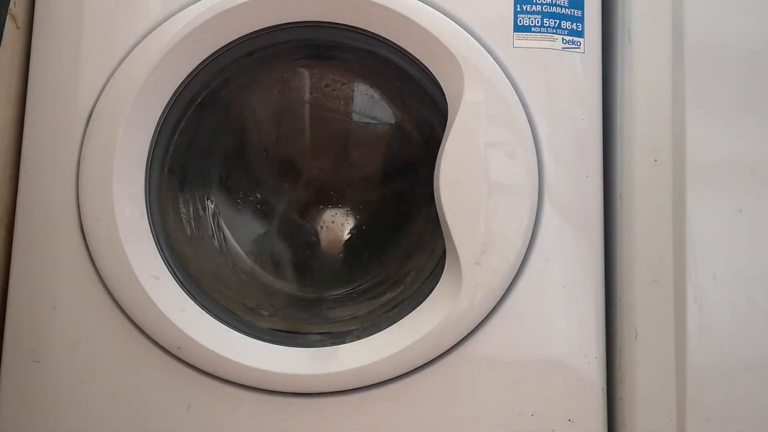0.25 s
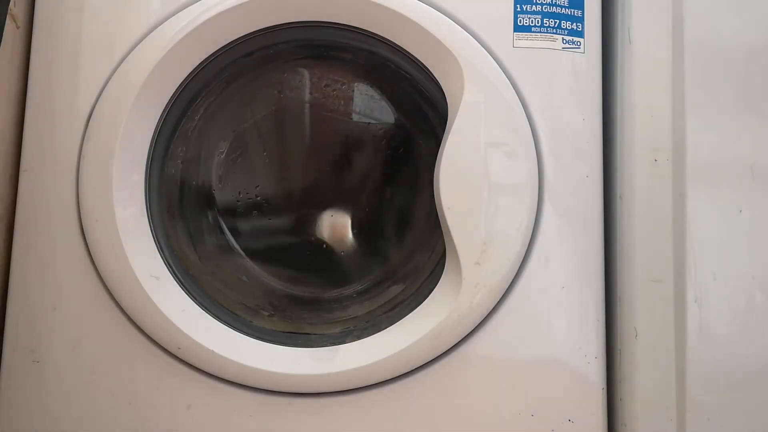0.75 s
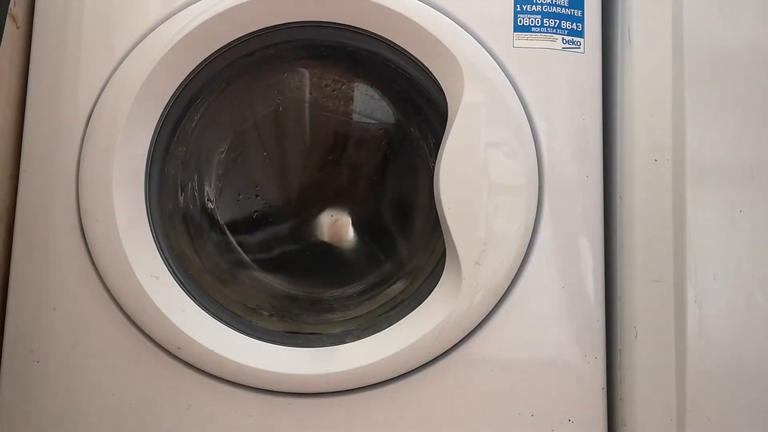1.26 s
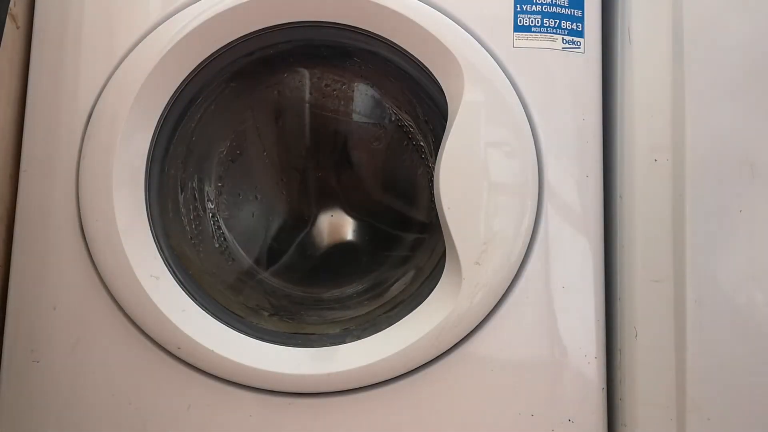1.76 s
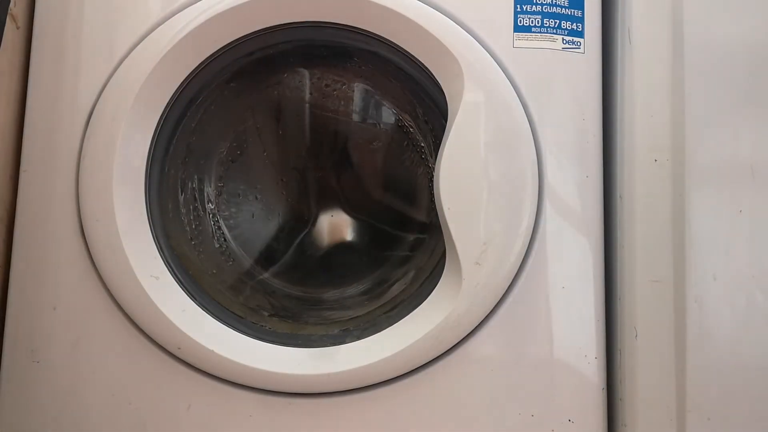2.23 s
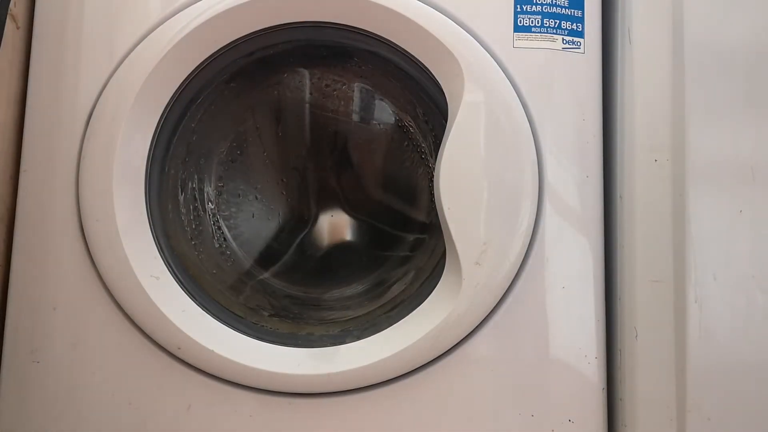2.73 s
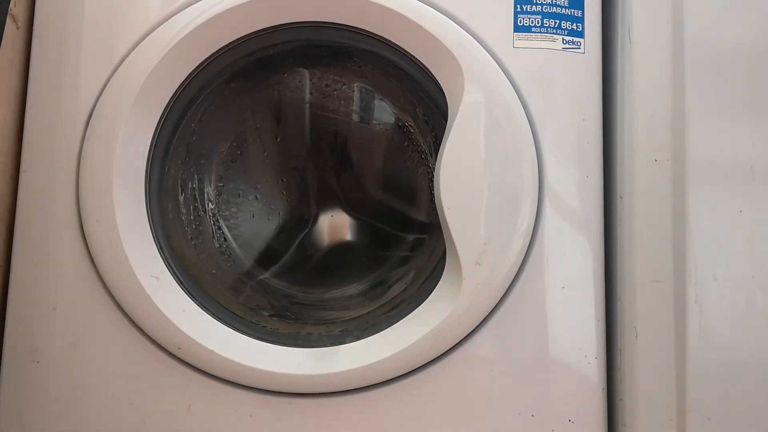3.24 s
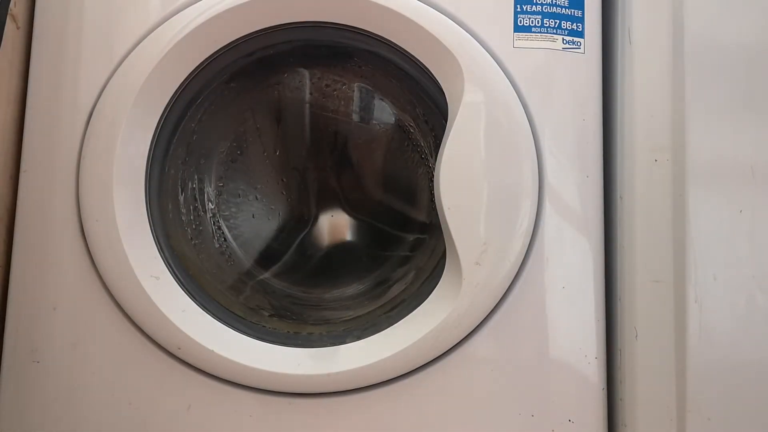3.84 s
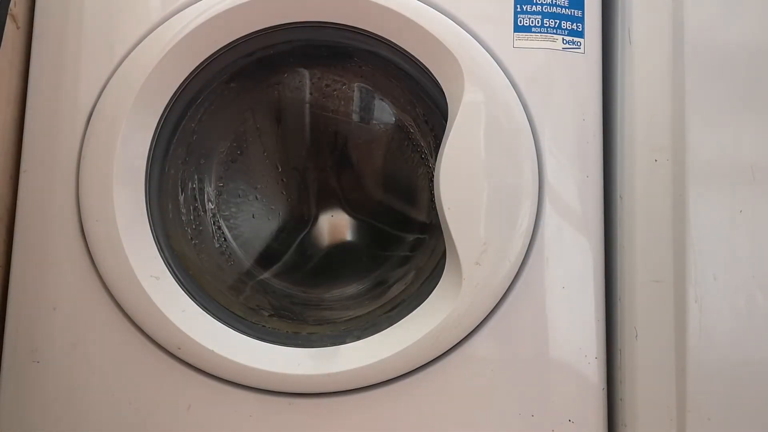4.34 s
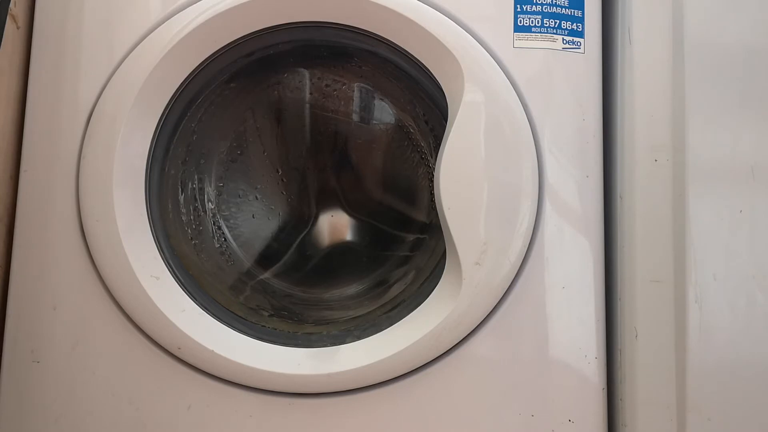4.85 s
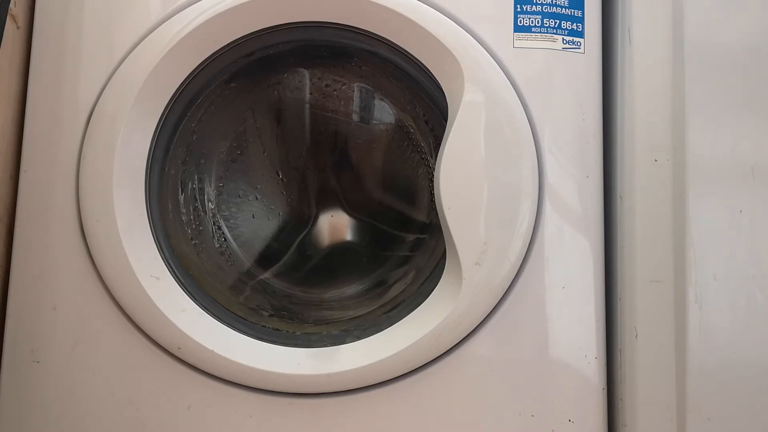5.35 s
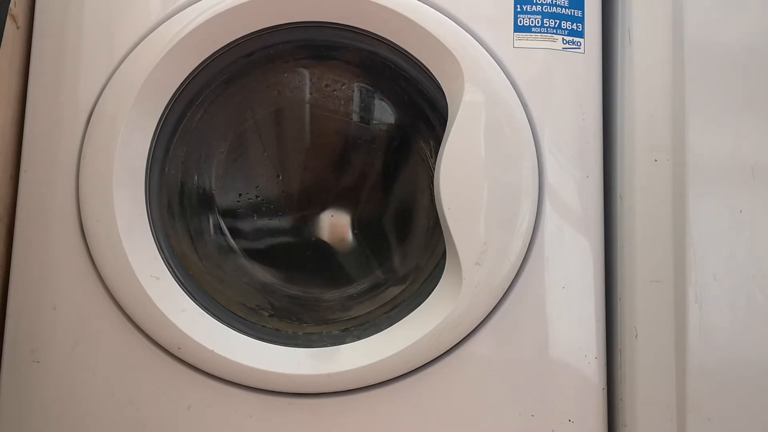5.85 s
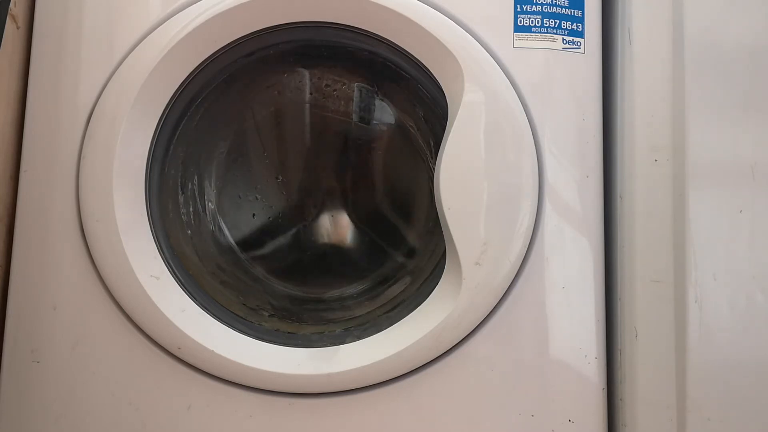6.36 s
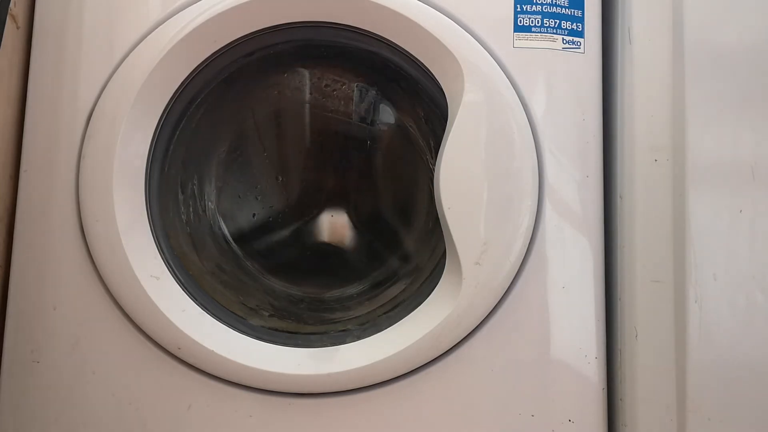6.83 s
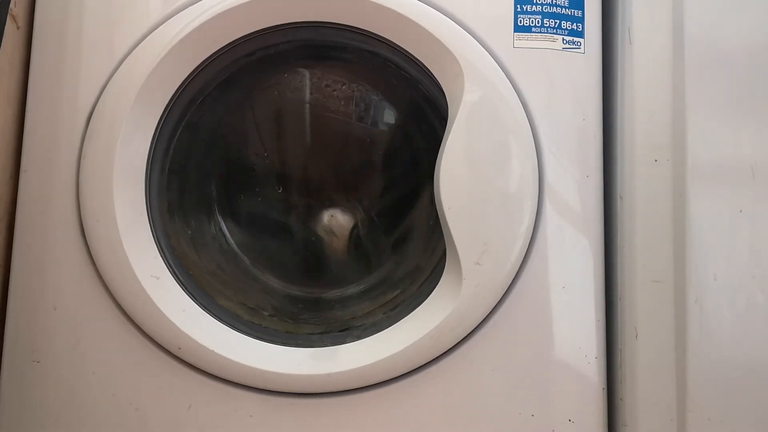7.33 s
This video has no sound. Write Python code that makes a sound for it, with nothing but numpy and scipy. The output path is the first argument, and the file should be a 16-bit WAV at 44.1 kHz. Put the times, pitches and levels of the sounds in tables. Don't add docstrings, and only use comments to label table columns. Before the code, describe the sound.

A front-loading washer turns with a deep fluttering rumble and ticking hiss, brakes to a low hum, then restarts with shrill squeals and speeds up.

```python
import sys
import numpy as np
from scipy import signal
from scipy.io import wavfile
from scipy.ndimage import uniform_filter1d

SR = 44100
rng = np.random.default_rng(int(sys.argv[2]) if len(sys.argv) > 2 else 0)


def store_pcm(level_fs):
    pcm = np.round(np.clip(level_fs, -1, 1) * 32767).astype(np.int16)
    wavfile.write(sys.argv[1], SR, np.atleast_2d(pcm).T)


def decibels_to_gain(level_db):
    exponent = np.asarray(level_db, float) / 20
    return 10 ** exponent


N = 334719
T = np.arange(N) / SR
START_S = 4.362
BACK = T > START_S
FORTH = T < START_S


def rms_one(x):
    return x / np.sqrt(np.mean(x ** 2) + 1e-20)


def in_time(rows):
    s, *columns = np.transpose(rows)
    return [np.interp(T, s, c) for c in columns]


def at_hz(points, hz):
    return np.interp(np.log(hz), np.log(np.array(points)[:, 0]), np.array(points)[:, 1])


def joined(*levels_db):
    return 10 * np.log10(sum(10 ** (db / 10) for db in levels_db))


def drift(rate):
    r = np.exp(-80 * np.pi * rate / SR)
    slow = signal.lfilter([1], [1, -2 * r, r * r], rng.standard_normal(N // 40 + 2002))[2000:]
    return np.interp(np.arange(N) / 40, np.arange(len(slow)), rms_one(slow))


def resonance(x, hz, width):
    r = np.exp(-np.pi * width / SR)
    return signal.lfilter([1, 0, -1], [1, -2 * r * np.cos(2 * np.pi * hz / SR), r * r], x)


def ringing(hz, width):
    return rms_one(resonance(rng.standard_normal((2, N)), hz, width))


# frequency in Hz, shared part from 0 to 1.
LIKENESS = [(60, 1), (130, 0.98), (250, 0.03), (500, 0.82), (1000, 0.02), (5000, 0.15), (15000, 0.2)]
# frequency in Hz, left minus right in dB.
LEAN = [(200, 0), (350, -1.5), (700, -.5), (1300, -1), (2400, 0), (8000, 0), (10000, -5), (12500, -10.5),
        (15000, -10)]
PORT_LAG = 25


def stereo(near, other, hz):
    alike, lean = np.clip(at_hz(LIKENESS, hz), 0, 1), at_hz(LEAN, hz) / 2
    late = np.roll(near, int(PORT_LAG * np.clip(np.log2(hz / 180), 0, 1)))
    right = alike * near + np.sqrt(1 - alike ** 2) * other
    return np.sqrt(2) * np.array([late * decibels_to_gain(lean), right * decibels_to_gain(-lean)])


def banded_noise(spectrum, level_db, patchy_db):
    low, high = spectrum[0][0], spectrum[-1][0]
    edges = np.geomspace(low, high, int(2 * np.log2(high / low)) + 2)
    centres = np.sqrt(edges[1:] * edges[:-1])
    total = np.sqrt(np.sum(decibels_to_gain(at_hz(spectrum, centres)) ** 2 * np.diff(edges)) / (SR / 2))
    out, together, white = 0, drift(1.9), rng.standard_normal((2, 2, N))
    for k, hz in enumerate(centres):
        sos = signal.butter(2, edges[k:k + 2], "band", fs=SR, output="sos")
        band = signal.sosfilt(sos, white[k % 2])
        gain_db = at_hz(spectrum, hz) + level_db(hz) + patchy_db * (together + drift(22.0))
        out = out + decibels_to_gain(gain_db) * stereo(*band, hz)
    return out / total


DOOR_SHIFT = 2.5
UPPER_BEND = .16


def orders(table, turns, lag, shift, bend, drag, wander_db):
    out = 0
    for k, level_db in table:
        phase = 2 * np.pi * k * (turns - lag) + shift + bend * (k - 6.7) ** 2 - drag * (k == 5)
        phase = phase + .18 * drift(.8) + .15 * rng.standard_normal()
        phase = phase + DOOR_SHIFT * (k == 11) + UPPER_BEND * max(k - 13, 0) ** 2
        out = out + decibels_to_gain(level_db + wander_db * drift(3.8)) * np.cos(phase)
    return rms_one(out)


# time in seconds, lead in turns.
LEAD = [(0, -.398), (1.2, -.405), (1.5, -.422), (2.4, -.53), (2.9, -.9), (4.36, -.82), (4.5, -1),
        (4.65, -1.15), (4.8, -1.18), (5.4, -1.176), (5.7, -1.11), (6, -1.06), (6.6, -1), (7.2, -.965),
        (7.5, -.958)]
SHAFT_HZ = 15.4


def shaft():
    return SHAFT_HZ * T + in_time(LEAD)[0]


# start in seconds, squeal level in dB, hold in seconds, jolt of the cabinet in dB.
GRIPS = [(2.353, -83, 0.12, -32), (2.54, -44.5, 0.018, -25.5), (2.59, -48, 0.021, -58),
         (2.636, -47.5, 0.055, -30.5), (2.783, -52.5, 0.059, -36), (2.856, -68, 0.11, -46),
         (2.98, -77, 0.058, -53), (3.251, -68.5, 0.07, -72), (3.346, -78, 0.054, -70),
         (3.487, -78, 0.046, -41), (3.86, -93, 0.16, -45.5), (4.1, -73.5, 0.071, -38),
         (4.358, -42.5, 0.094, -27), (4.457, -37, 0.15, -21.5), (4.547, -36.5, 0.075, -31.5),
         (4.616, -34, 0.12, -21.5), (4.706, -39.5, 0.15, -22.5), (4.746, -37, 0.034, -47),
         (4.81, -43.5, 0.079, -25), (4.873, -36.5, 0.051, -27), (4.935, -35.5, 0.049, -27),
         (5.005, -37.5, 0.087, -33), (5.14, -42, 0.033, -25.5), (5.202, -41.5, 0.1, -28.5),
         (5.317, -84, 0.064, -22), (5.4, -76, .04, -46), (5.458, -48.5, 0.078, -34),
         (5.527, -45, 0.082, -28), (5.606, -72, 0.05, -38), (5.706, -58, 0.063, -26.5),
         (5.774, -57, 0.092, -29)]
GRIP_ATTACK_S, GRIP_SAG_DB_PER_S, GRIP_RELEASE_DB_PER_S = 0.01, 47, 281.5


def grips():
    t = np.arange(0, N, 32) / SR
    squeals, jolts = [], []
    for s, squeal_db, hold, jolt_db in GRIPS:
        age = t - s
        bite_db = 20 * np.log10(np.clip(age / GRIP_ATTACK_S, 1e-5, 1))
        release_db = GRIP_RELEASE_DB_PER_S * np.clip(age - hold, 0, 1)
        shape_db = bite_db - GRIP_SAG_DB_PER_S * age - release_db
        shape_db = np.where(age > 0, np.maximum(shape_db, -100), -100)
        squeals.append(squeal_db + shape_db)
        jolts.append(jolt_db + shape_db)
    return in_time(np.transpose([t, joined(*squeals), joined(*jolts)]))


# time in seconds, level in dB.
EFFORT = [(0, -47), (2.35, -47.5), (2.52, -52.5), (2.68, -56), (2.76, -59.5), (3.0, -62.5), (3.1, -65),
          (3.8, -65.5), (4.1, -65), (4.35, -61.5), (4.38, -55), (4.46, -56.5), (4.52, -47.5), (4.97, -40.5),
          (5.19, -44.5), (5.4, -43), (6.0, -43), (7.5, -45)]
KNEE_DB = -53
TREBLE_DB, TREBLE_ABOVE, TREBLE_BELOW = -52.5, 0.48, 2.2
SHAKE_DB, SHAKE_ABOVE, SHAKE_BELOW = -29, 0.4, 7
GRIP_HISS_DB, GRIP_HISS_FOLLOWS = -56.5, 0.57
GRIP_TREBLE_DB, GRIP_TREBLE_FOLLOWS = -51.5, 0.77


def motor():
    effort_db, = in_time(EFFORT)
    above, below = np.maximum(effort_db - KNEE_DB, 0), np.minimum(effort_db - KNEE_DB, 0)
    grip_db, jolt_db = grips()
    hiss_db = joined(effort_db, GRIP_HISS_DB + GRIP_HISS_FOLLOWS * (grip_db + 53.5))
    treble_db = joined(TREBLE_DB + TREBLE_ABOVE * above + TREBLE_BELOW * below,
                       GRIP_TREBLE_DB + GRIP_TREBLE_FOLLOWS * (grip_db + 51))
    shake_db = joined(SHAKE_DB + SHAKE_ABOVE * above + SHAKE_BELOW * below,
                      uniform_filter1d(jolt_db, size=400))
    resting_db = np.clip(-61 - hiss_db, 0, 12)
    return hiss_db - resting_db, treble_db - hiss_db, shake_db


# multiple of the shaft rate, level in dB.
FORWARD = [(1, -29), (2, -2), (3, -9), (4, -1), (5, 0), (6, -2), (7, -3), (8, -7), (9, -14), (10, -9),
           (11, -6), (12, -15), (13, -18), (14, -27), (15, -28), (16, -33), (17, -31), (18, -30), (19, -27),
           (20, -24), (21, -40), (22, -38)]
REVERSE = [(1, -29), (2, -4), (3, -14), (4, -3), (5, -5), (6, 0), (7, -3), (8, -10), (9, -17), (10, -13),
           (11, -11), (12, -21), (13, -28), (14, -33), (15, -30), (16, -33), (17, -30), (18, -35),
           (19, -33), (20, -27), (21, -35), (22, -36)]
# frequency in Hz, density in dB per Hz.
RATTLE = [(15, -24), (28, -5.5), (48, 10), (97, 9.5), (178, -2), (237, -29.5), (303, -1), (400, -28),
          (520, -53), (880, -120)]
UPPER_DB, UPPER_FALL_DB = -42, 0.5
RATTLE_FORWARD_DB = -1


def cabinet(turns, shake_db):
    upper = [(k, UPPER_DB - UPPER_FALL_DB * (k - 23)) for k in range(23, 38)]
    forward = orders(FORWARD + upper, turns, .3, -.19, .02, 1.8, 1.2)
    reverse = orders(REVERSE + upper, turns, .34, .31, .02, .62, 1.2)
    shake = decibels_to_gain(shake_db + 0.5) * np.where(T < 3.6, forward, reverse)
    rattle_db = shake_db - 9.5 + RATTLE_FORWARD_DB * (T < 2.5)
    lagged = np.gradient(shake) * 4.1
    body = shake + lagged * [[1], [-1]] + banded_noise(RATTLE, lambda hz: rattle_db, patchy_db=1.0)
    driven = np.clip((shake_db + 42) / 8, 0, 1)
    dull = signal.sosfiltfilt(signal.butter(3, 140, fs=SR, output="sos"), body)
    return driven * body + (1 - driven) * dull


BRAKE_BASS_DB, BRAKE_TREBLE_DB, SURGE_BASS_DB, SURGE_S = -3.5, -5, 4, (4.5, 5.18)


def brush_level(turns, hiss_db, bright_db):
    angle = turns % 1
    ticks_db = 8 * np.exp(-angle / 0.03) + 4 * np.exp(-((angle - .27) % 1) / 0.027)
    beat_db = ticks_db + 3 * (angle < .45) - 2.5
    beat_db = beat_db * np.clip(0.64 + 0.19 * drift(14.0), .2, 1.35)
    braking = uniform_filter1d(((T > 2.55) & FORTH) * 1., size=3000)
    surge = uniform_filter1d(((T > SURGE_S[0]) & (T < SURGE_S[1])) * 1., size=3000)

    def level_db(hz):
        treble = np.clip(np.log2(hz / 2800), 0, 1)
        bass = np.clip(np.log2(1200 / hz), 0, 1)
        level = hiss_db + (BRAKE_BASS_DB * braking + SURGE_BASS_DB * surge) * min(1, 3 * bass)
        level = level + BRAKE_TREBLE_DB * braking * (hz > 7500)
        level = level - 0.8 * bass * np.clip(bright_db + 10.0, 0, 8) + treble * (bright_db + 3.0)
        return level + (0.41 + 0.79 * treble) * beat_db

    return level_db


# frequency in Hz, density in dB per Hz.
HISS = [(130, -49), (220, -12.5), (309, -6.5), (337, -1.5), (518, -8), (556, -9), (630, 1.5), (1400, -12),
        (1900, -2.5), (4390, -16), (5640, -14), (6510, -23.5), (12100, -19), (14800, -27.5), (15600, -47)]


def brushes(level_db):
    return decibels_to_gain(1.0) * banded_noise(HISS, level_db, patchy_db=1.26)


# frequency in Hz, width in Hz, level in dB.
HOUSING = [(1920, 32, -12), (2320, 470, -11.5), (5610, 410, -3), (7440, 390, -14), (10850, 40, -31)]
# frequency in Hz, width in Hz, level in dB, dB more in the second direction.
PANELS = [(264, 4, -23, 9), (309, 2, -14, 1), (410, 3, -20, 8), (436, 5, -20, -4), (573, 4, -14, 2),
          (690, 8, -19, 4), (826, 10, -19, 4), (1332, 40, -28, 6)]


def housing(level_db, hiss_db):
    out = 0
    squeal_db = grips()[0]
    for hz, width, ring_db, *back_db in HOUSING + PANELS:
        locked_db = np.clip(squeal_db - hiss_db + 16, 0, 4) * (5000 < hz < 6000)
        gain_db = ring_db + level_db(hz) - locked_db + sum(back_db) * BACK
        out = out + decibels_to_gain(gain_db) * stereo(*ringing(hz, width), hz)
    return out


# time in seconds, level in dB.
PUMP = [(0.0, -76), (0.66, -34.5), (1.3, -17), (2.0, -34.5), (2.67, -30), (3.0, -29.5), (3.08, -36),
        (3.56, -31.5), (3.77, -36.5), (4.04, -34.5), (4.16, -25.5), (4.3, -31), (4.42, -15.5), (4.6, -25),
        (5.3, -15), (6.0, -40), (6.6, -18.5), (7.48, -46)]
# multiple of the pump rate, level in dB.
THROB = [(1, 10), (2, 2.5), (3, 0), (4, -12.5), (5, -51.5), (6, -21.5), (7, -76), (8, -81), (9, -57.5),
         (10, -29)]
PUMP_HZ, PUMP_SWELL_DB, PUMP_SWELLS_PER_S = 30.75, 1.2, 5


def pump():
    throb = orders(THROB, PUMP_HZ * T, lag=.1, shift=.3, bend=.02, drag=0, wander_db=.6)
    pipe = stereo(*ringing(279, 5.0), 400)
    throb_db = in_time(PUMP)[0] - 6.5 + PUMP_SWELL_DB * drift(PUMP_SWELLS_PER_S)
    return decibels_to_gain(throb_db) * throb + decibels_to_gain(-70.0) * pipe * np.clip((4.15 - T) / 0.085, 0, 1)


# frequency in Hz, density in dB per Hz.
ROOM = [(76, -29), (130, 9.5), (194, -11), (219, -59), (278, -15), (340, -13.5), (407, -18), (518, -23),
        (907, -36), (1220, -20), (1530, -12.5), (3400, -25), (15600, -39.5)]
ROOM_DB = -64.5


def room():
    return banded_noise(ROOM, lambda hz: ROOM_DB + 3.5, patchy_db=.8)


# start in seconds, peak in dB, pitch in Hz, 60 dB decay in seconds,
# width as a share of the pitch.
KNOCKS = [(0.954, -32, 1840, 0.04, 0.16), (0.961, -20, 1125, 0.078, 0.072), (0.964, -36, 1900, 0.084, 0.24),
          (0.982, -26.5, 1150, 0.18, 0.16), (1.585, -29, 1900, 0.15, 0.96),
          (1.594, -27.5, 1730, 0.08, 0.15), (1.59, -32, 1110, 0.08, 0.16), (1.681, -17.5, 2620, 0.41, 0.1),
          (1.683, -28, 3120, 0.19, 0.073), (1.683, -27, 1100, 0.097, 0.79),
          (2.015, -27, 2330, 0.064, 0.072), (2.76, -48, 696, 0.15, 0.08), (2.82, -53, 706, 0.15, 0.08),
          (2.083, -20, 846, 0.22, 0.073), (6.688, -29, 840, 0.97, 0.44), (7.27, -30.5, 1120, 0.94, 0.29)]


def knocks():
    out, t = np.zeros((2, N)), np.arange(int(.3 * SR)) / SR
    for s, peak_db, hz, t60, share in KNOCKS:
        burst = rng.standard_normal((2, len(t)))
        burst[:, [2, 420]] = 15, 7
        ring = 0
        for side in (-.5, .5):
            split = resonance(burst, hz * (1 + side * share), share * hz / 2)
            ring = ring + resonance(split, hz, 2 * share * hz)
        ring = rms_one(ring) * decibels_to_gain(-60 * t / min(.11, t60))
        tail = resonance(resonance(burst[::-1], 1.12 * hz, 0.4 * hz), 1.05 * hz, .7 * hz)
        tail = rms_one(tail) * decibels_to_gain(-0.5 - 60 * t / t60)
        struck = np.sin(2 * np.pi * hz * t) * decibels_to_gain(-60 * t / min(0.05, t60))
        struck = struck * (share < .2)
        knock = (1.02 * ring + tail + 1.84 * struck) * np.minimum(t / 0.00025, 1)
        at = round(s * SR)
        out[:, at:at + len(t)] += decibels_to_gain(peak_db - 19.0) * knock
    return out


LOW_START_DB, LOW_FALL_DB_PER_S, LOW_REST_DB = 0, 50, -8.5
NEXT_PEAK_S, NEXT_SPAN_S, NEXT_PEAK_DB, NEXT_REST_DB = 4.64, 0.071, -4, -10.5


def load():
    falling_db = LOW_START_DB - LOW_FALL_DB_PER_S * np.clip(T - START_S - .12, 0, 9)
    low_db = np.where(T > START_S - .1, np.maximum(falling_db, LOW_REST_DB), LOW_REST_DB)
    near_speed = np.exp(-((T - NEXT_PEAK_S) / NEXT_SPAN_S) ** 2)
    next_db = NEXT_REST_DB + (NEXT_PEAK_DB - NEXT_REST_DB) * near_speed
    return grips()[0], low_db, next_db


# frequency in Hz, width in Hz, level in dB.
BRUSH = [(2230, 50, -9), (2760, 40, -17), (3610, 35, -15), (4030, 50, -19), (4250, 34, -13), (5580, 46, 0),
         (6240, 33, -8), (6650, 35, -16), (7120, 41, -9), (8040, 71, -19), (9190, 43, -15),
         (10600, 41, -16), (11900, 46, -19), (12400, 30, -23), (14400, 35, -17), (14900, 60, -27)]
# time in seconds, level in dB.
SING = [(2.45, -90), (2.54, -65), (2.7, -46.5), (2.76, -59), (2.8, -47), (2.95, -63), (3.02, -70),
        (3.08, -92), (4.44, -90), (4.47, -46.5), (4.9, -37), (5.09, -44), (5.13, -64.5), (5.21, -48),
        (5.35, -55), (5.6, -65), (5.8, -88)]
HIGH_DB_PER_DB = .5
BRAKE_MUTE_DB = -10
BACK_MODES_DB = -5.5
TOP_DB_PER_DB = 2


def squeal():
    main_db, low_db, next_db = load()
    steady_db = joined(main_db, in_time(SING)[0]) - main_db
    out = 0
    for hz, width, level_db in BRUSH:
        main = 5000 < hz < 6000
        if hz < 3000 or 4000 < hz < 4800:
            own_db = low_db + 6
        elif 6000 < hz < 6400:
            own_db = next_db + 7
        else:
            own_db = -1.5
        own_db = own_db + (steady_db - 1.5) * main + 12.0 * (hz > 13000)
        own_db = own_db + HIGH_DB_PER_DB * np.clip(-72 - main_db, 0, 16) * (hz > 10000)
        own_db = own_db + FORTH * (2.8 * (10000 < hz < 11000) - 4.0 * (7000 < hz < 7200))
        if hz < 5000 or 6000 < hz < 7000 or 8000 < hz < 9500 or hz > 14000:
            own_db = own_db + BRAKE_MUTE_DB * FORTH
        if 11000 < hz < 13000:
            lasting_db = TOP_DB_PER_DB * np.clip(-46 - main_db, 0, 18) * (hz > 12000)
            own_db = own_db + np.where(BACK, BACK_MODES_DB + lasting_db, -15)
        wobble = np.cumsum(hz + 0.27 * width * np.array([drift(24.1), drift(24.74)]), axis=1)
        pure = (1 if hz > 5000 else .6) * np.sin(2 * np.pi * wobble / SR)
        rough = (.55 if main else .7 if hz > 5000 else 1.1) * ringing(hz, 2.2 * width)
        out = out + decibels_to_gain(level_db + own_db + 1.0 * drift(7.0)) * stereo(*(pure + rough), hz)
    return decibels_to_gain(main_db - 0.5) * out


WHINE_HZ, WHINE_WIDTH_HZ, WHINE_DB = 1335, 40, -52
WHINE_PEAK_S, WHINE_RISE_DB_PER_S, WHINE_FALL_DB_PER_S = 5.13, 15, 13


def whine(turns):
    age = T - WHINE_PEAK_S
    level_db = WHINE_DB + np.where(age < 0, WHINE_RISE_DB_PER_S, -WHINE_FALL_DB_PER_S) * age
    level_db = level_db + 1.3 * drift(13.0) + 5.0 * np.cos(2 * np.pi * (2 * turns + 0.34))
    rough = resonance(rng.standard_normal((2, N)), WHINE_HZ, WHINE_WIDTH_HZ)
    rough = rms_one(resonance(rough, WHINE_HZ, 3 * WHINE_WIDTH_HZ))
    tone = np.sin(2 * np.pi * np.cumsum(WHINE_HZ + 8 * drift(15.0)) / SR) + .6 * rough
    return decibels_to_gain(level_db) * BACK * stereo(*tone, WHINE_HZ)


def scene():
    turns = shaft()
    hiss_db, bright_db, shake_db = motor()
    level_db = brush_level(turns, hiss_db, bright_db)
    machine = cabinet(turns, shake_db) + brushes(level_db) + housing(level_db, hiss_db) + pump()
    return machine + room() + knocks() + squeal() + whine(turns)


def top_cut(x):
    return signal.sosfilt(signal.butter(12, 15730, fs=SR, output="sos"), x)


MIC_HISS_DB = -89.5
END_S, END_FADE_S = 7.4848, .0006


def record(dry):
    dull = signal.sosfiltfilt(signal.butter(6, 12600, fs=SR, output="sos"), dry)
    stepped = dull + decibels_to_gain(-13) * (dry - dull)
    heard = signal.sosfilt(signal.cheby2(14, 40, 15350, fs=SR, output="sos"), stepped)
    heard = heard + decibels_to_gain(MIC_HISS_DB) * np.diff(rng.standard_normal((2, N + 1)))
    heard = .55 * np.tanh(heard / .55)
    return top_cut(heard * np.clip((END_S - T) / END_FADE_S, 0, 1))


dry = scene()
out = record(dry)
store_pcm(out)
```